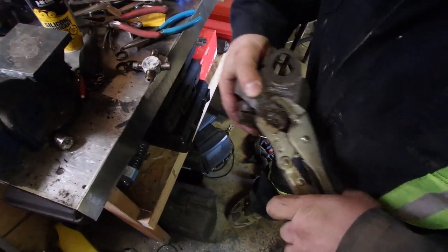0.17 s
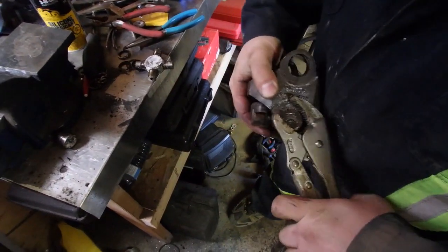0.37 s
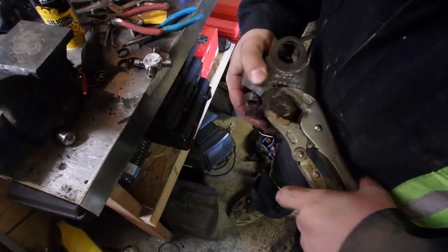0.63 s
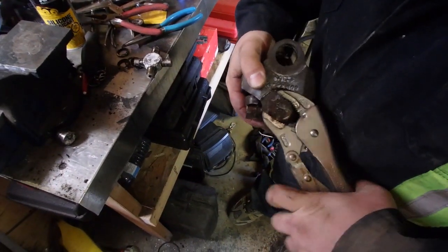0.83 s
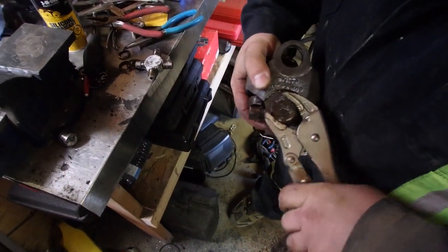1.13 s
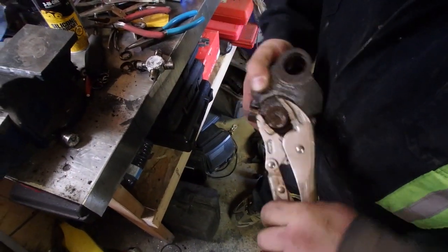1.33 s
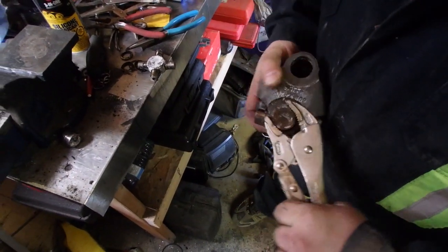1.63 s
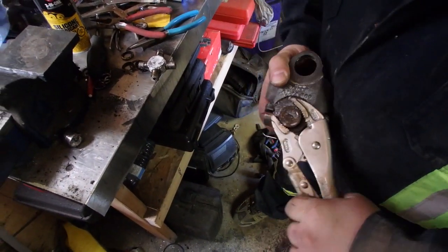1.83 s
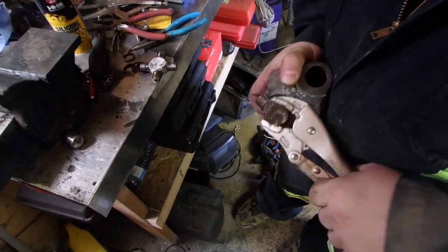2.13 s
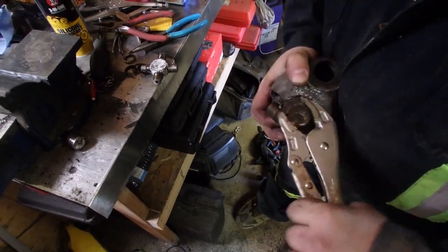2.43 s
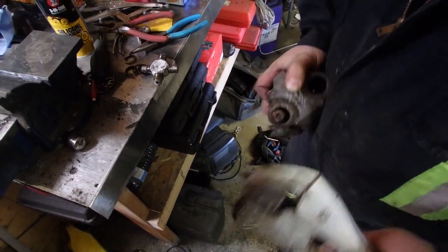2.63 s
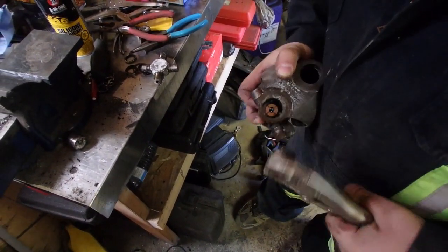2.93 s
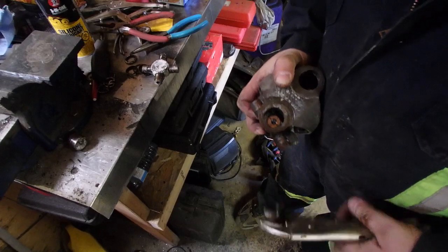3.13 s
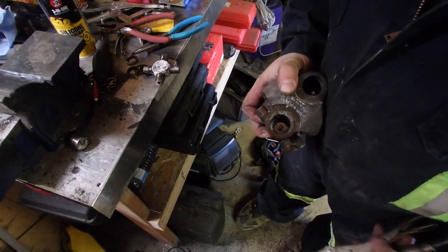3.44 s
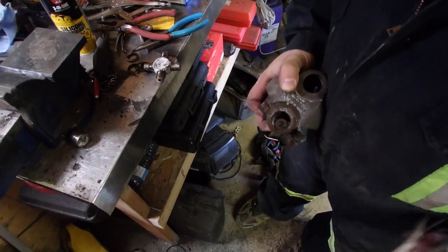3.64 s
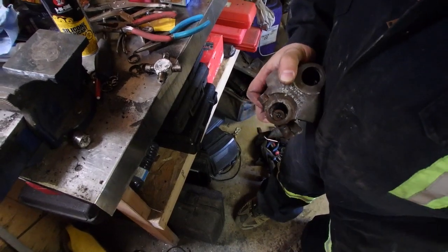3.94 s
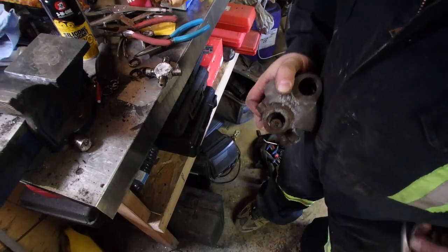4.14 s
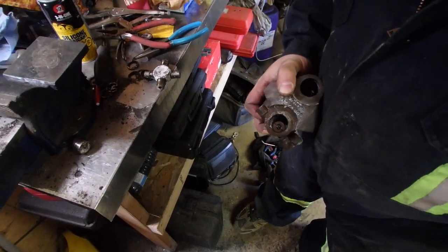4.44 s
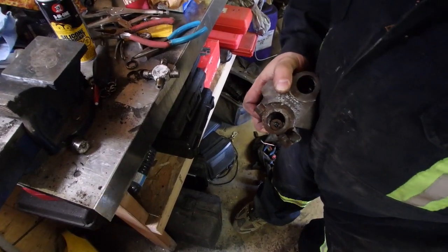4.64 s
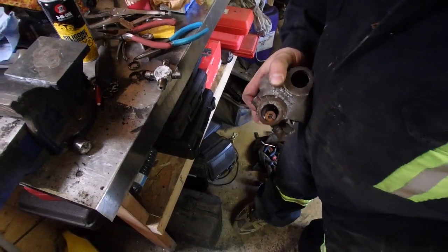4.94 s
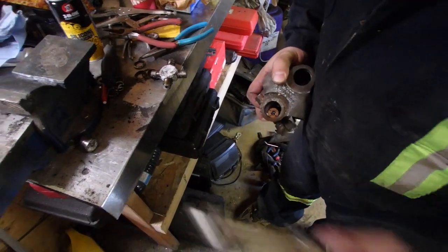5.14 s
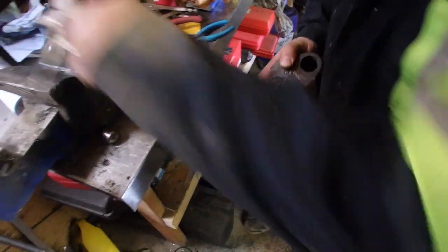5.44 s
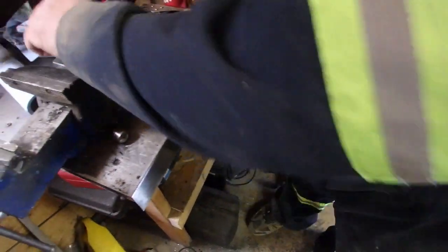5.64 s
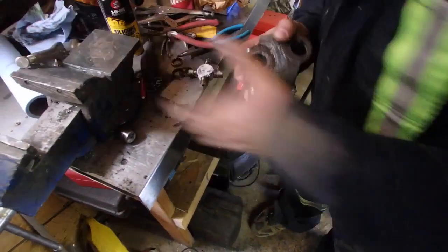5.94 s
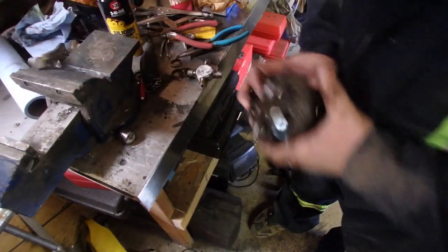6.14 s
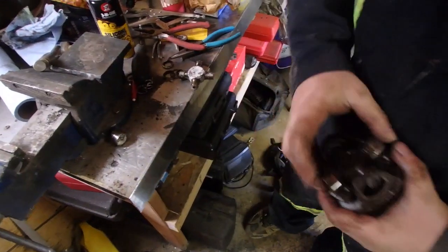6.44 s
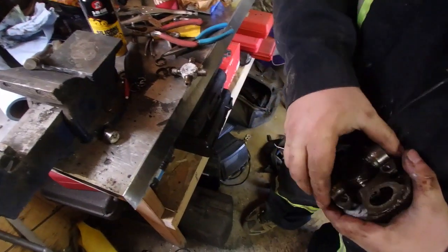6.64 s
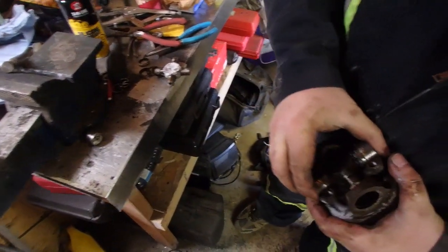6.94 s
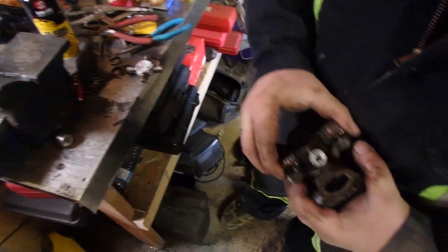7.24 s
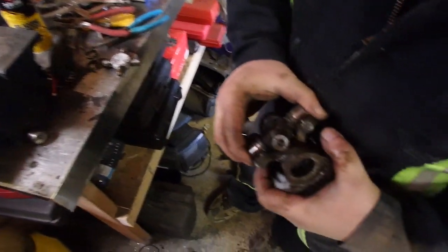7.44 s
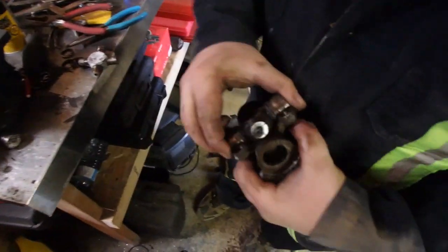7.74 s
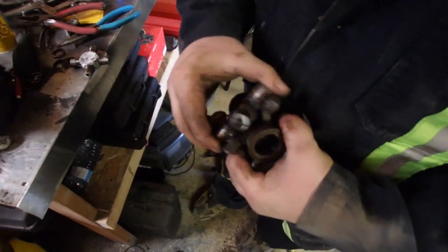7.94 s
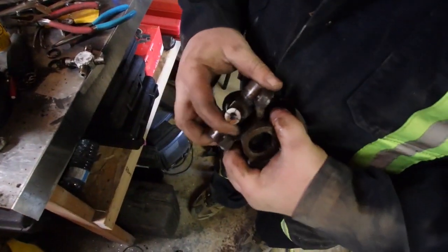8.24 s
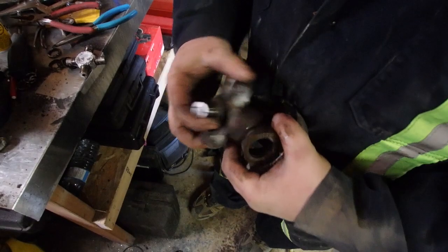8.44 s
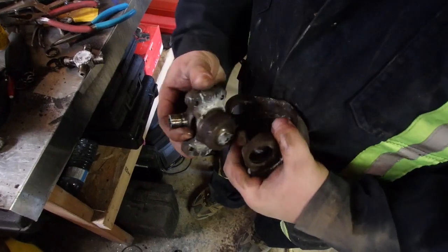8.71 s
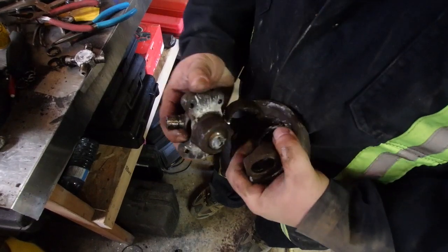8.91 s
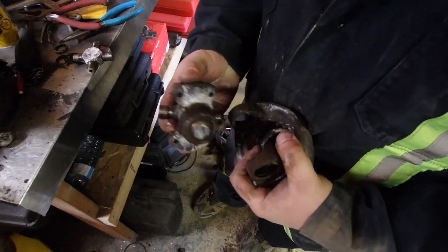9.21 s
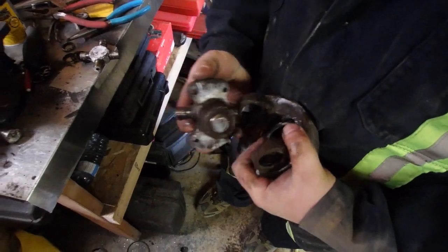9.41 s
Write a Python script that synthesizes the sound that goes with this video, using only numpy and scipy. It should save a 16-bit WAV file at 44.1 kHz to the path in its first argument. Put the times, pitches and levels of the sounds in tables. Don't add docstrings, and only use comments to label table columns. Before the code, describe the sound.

A belt-driven blower runs without pause for about 9.6 seconds in a garage: a steady low-mid hum with a blade tone near 215 Hz, rough pulsing about twenty times a second, thin swelling whines, belt slap and rushing air. It starts slightly subdued and rises quickly. Close by, a dull steel tick comes at 0.15 s, a light tap at 1.0 and a hard, bright pliers click at 1.5, after which the drone ducks and recovers over a second. Only drone follows until tiny bright ticks at 4.9, then a sharp click at 5.2. Around 5.75 to 6.0 a snap, faint rattle and pliers landing with a short thud and bounces on the bench. A final click rings at 6.3 and a small tick at 6.5. The drone, ducked again, climbs back and continues alone to the end. The camera microphone sounds slightly boxy, with little stereo width in the lows.

```python
import sys
import numpy as np
from scipy import signal
from scipy.fft import rfft, irfft, next_fast_len
from scipy.io import wavfile
from scipy.ndimage import uniform_filter1d

SR = 44100
rng = np.random.default_rng(int(sys.argv[2]) if len(sys.argv) > 2 else 0)


def gain_from_db(level_db):
    decades = np.asarray(level_db, float) / 20
    return 10 ** decades


def materialize(psi):
    bounded = np.clip(np.atleast_2d(psi).T, -1, 1)
    quanta = np.round(bounded * 32767).astype(np.int16)
    wavfile.write(sys.argv[1], SR, quanta)


N = 422037
EDGE_HZ = 14250

# centre in Hz, width in Hz, height in dB.
CASING_MODES = [(541, 34, 11.5), (993.6, 37, 12.5), (1130, 40, -2.5)]


def unit(x):
    return x / np.sqrt(np.mean(x ** 2) + 1e-20)


def along(points, hz):
    f, v = np.transpose(points)
    return np.interp(np.log(hz + 1), np.log(f + 1), v)


def bumps(modes, hz):
    return sum(db / (1 + (2 * (hz - centre_hz) / width) ** 2) for centre_hz, width, db in modes)


def wobble(rate, count):
    knots = rng.standard_normal((count, int(N * rate / SR) + 2))
    at = np.arange(N) * rate / SR
    return np.array([np.interp(at, np.arange(len(k)), k) for k in knots])


def filtered(x, response):
    m = next_fast_len(x.shape[-1] + 8192)
    return irfft(rfft(x, m) * response(np.fft.rfftfreq(m, 1 / SR)), m)[..., :x.shape[-1]]


def stereo(mid, other):
    # frequency in Hz, side minus mid in dB.
    apart = [(60, -53), (110, -67), (200, -81), (370, -18.5), (690, -28), (1270, -23), (2340, -22),
             (4300, -6.5), (7910, -3.5), (14600, 4.5)]
    # frequency in Hz, left minus right in dB.
    lean = [(60, 0), (240, 0), (370, -.5), (930, 0), (2300, .4), (4500, 2), (9000, .7), (14600, .5)]
    # frequency in Hz, phase by which left leads in radians.
    lead = [(2840, 0), (3100, -0.85), (4130, 0.93), (4390, -2), (4740, 0.76), (5940, -0.63), (6370, 0.27),
            (14700, 1)]
    side = filtered(other, lambda hz: gain_from_db(along(apart, hz) - 2.7 * (hz > 2500) - 15 * (hz < 250)))
    half = np.array([[.5], [-.5]])
    paths = lambda hz: gain_from_db(half * along(lean, hz)) * np.exp(1j * half * along(lead, hz))
    return filtered(np.array([mid + side, mid - side]), paths)


def gain_db():
    # start in seconds, gain in dB.
    ducks = [
        (-.05, -7),
        (.986, -3),
        (1.491, -12),
        (5.182, -15),
        (5.785, -13),
        (5.928, -12.5),
        (6.292, -12),
    ]
    t = np.arange(N) / SR
    hold = .05
    ramps = [np.where(t >= s, np.clip(db + 12 * (t - s - hold), db, 0), 0) for s, db in ducks]
    keep = np.exp(-1 / (0.004 * SR))
    return signal.lfilter([1 - keep], [1, -keep], np.min(ramps, 0), zi=[ducks[0][1]])[0]


def mains_hum():
    # frequency in Hz, level in dB rms.
    mains = [(120, -62)]
    t = np.arange(N) / SR
    return sum(gain_from_db(db + 12.5) * np.sin(2 * np.pi * hz * t) for hz, db in mains)


def rushing_air():
    # frequency in Hz, level in dB per Hz.
    air_colour = [(25, -53), (55, -52), (80, -40), (190, -22), (280, -18), (750, -18.5), (1000, -11),
                  (2060, -18), (3840, -12.5), (4600, -14.5), (6970, -17), (11700, -31.5), (13300, -49),
                  (14200, -56)]
    z = signal.stft(rng.standard_normal((2, N)), nperseg=512)[2]
    field = rng.standard_normal(z.shape[1:])
    field = uniform_filter1d(uniform_filter1d(field, 6, 0), 12, 1)
    air = signal.istft(z * gain_from_db(0.83 * unit(field)), nperseg=512)[1][:, :N]
    return unit(filtered(air, lambda hz: gain_from_db(along(air_colour, hz) + 1.02 * bumps(CASING_MODES, hz))))


def belt_slap(turns):
    # frequency in Hz, level in dB per Hz.
    slap_colour = [(50, -59), (90, -22), (180, -35), (260, -12.5), (550, -15), (750, -14), (980, -10.5),
                   (1390, -13.5), (1800, -15.5), (2400, -43.5)]
    lap = rng.standard_normal((2, 16384))
    belt_turns = 8
    place = (turns / belt_turns % 1 * lap.shape[1]).astype(int)
    return unit(filtered(lap[:, place], lambda hz: gain_from_db(along(slap_colour, hz) + 0.52 * bumps(CASING_MODES, hz))))


def ticks():
    # start in seconds, peak in dB, ring in Hz, second ring in Hz, t60 in seconds.
    touches = [
        (0.149, -10, 3470, 4300, 0.02),
        (1.495, -22, 4030, 7000, .12),
        (4.8994, -25, 7560, 8200, .03),
        (4.9624, -17.5, 7840, 11700, .06),
        (5.186, -19, 3330, 3940, 0.12),
        (5.2214, -26, 3800, 3530, 0.067),
        (5.434, -33, 2360, 2570, .06),
        (5.764, -28, 11700, 8300, .07),
        (6.2934, -22, 3100, 5450, 0.09),
        (6.4852, -20.5, 3970, 4870, 0.057),
    ]
    out, t = np.zeros(N + SR), np.arange(SR // 4) / SR
    quiet_db = gain_db()
    for s, db, ring_hz, second_hz, t60 in touches:
        shake = np.cumsum(rng.normal(0, 0.079, (2, len(t))), axis=1)
        first = np.sin(2 * np.pi * ring_hz * t + shake[0])
        second = gain_from_db(-9.5) * np.sin(2 * np.pi * second_hz * t + shake[1])
        at = round(s * SR)
        fade = gain_from_db(db - 4 - quiet_db[at] - 60 * t / t60) * (1 - np.exp(-t / 0.0004))
        out[at:at + len(t)] += fade * (first + second)
    return out[:N]


def knocks():
    # frequency in Hz, level in dB.
    plier_modes = [(3300, 0), (3900, 2), (5400, -7), (7000, -2), (8100, 7), (9800, -3), (11700, -14)]
    # frequency in Hz, level in dB.
    bench_colour = [(60, -50), (150, -18), (280, 1), (450, 0.5), (850, -5), (1200, -4), (2500, -13),
                    (5000, -27)]
    # frequency in Hz, level in dB.
    crack_colour = [(800, -24), (2400, -4), (4000, 2.5), (7000, 1), (10000, -5), (12500, -14), (14000, -16),
                    (15500, -30)]
    # start in seconds, peak in dB, ring in Hz, t60 in seconds, left minus right in dB.
    clicks = [
        (0.1516, -20, 6900, 0.028, -.5),
        (1.4906, -10, 3840, .08, -.5),
        (1.4914, -8.5, 7900, 0.016, 0),
        (5.1848, -10.5, 6420, 0.083, 4),
        (5.7626, -21, 7100, 0.044, 7),
        (5.785, -12.5, 6900, 0.07, 4),
        (5.866, -32, 7100, 0.066, 4),
        (5.911, -27, 3980, 0.12, 9),
        (6.292, -16.5, 6860, 0.088, 4),
    ]
    # start in seconds, peak in dB, ring in Hz, t60 in seconds, thud in dB.
    thuds = [
        (0.985, -21, 6900, 0.037, -4),
        (5.738, -33, 1500, .1, 1),
        (5.9268, -18, 3220, 0.068, -0.5),
        (5.934, -19, 2960, .08, 1.5),
        (5.9463, -29.5, 4500, 0.1, 2),
        (5.9882, -28, 3150, 0.098, 2.5),
    ]
    # 0.5 dB to the left, snap up to 7500 Hz
    contacts = [(*row, -18, 11900) for row in clicks]
    contacts += [(*row, 0.5, thud_db, 7500) for *row, thud_db in thuds]
    out, t = np.zeros((2, N + SR)), np.arange(SR // 4) / SR
    quiet_db = gain_db()
    fade = lambda life: gain_from_db(-60 * t / np.clip(life, .004, .5)) * (1 - np.exp(-t / 0.00028))
    for s, db, ring_hz, t60, pan_db, thud_db, top_hz in contacts:
        noise = rng.standard_normal((5, len(t)))
        own = unit(filtered(noise[0], lambda hz: 1 / (1 + ((hz - ring_hz) / 250) ** 2)))
        thud = unit(filtered(noise[1], lambda hz: gain_from_db(along(bench_colour, hz))))
        crack, *wash = unit(filtered(noise[2:], lambda hz: gain_from_db(along(crack_colour, hz)) * (hz < EDGE_HZ)))
        snap = filtered(noise[2], lambda hz: hz ** 2 / (hz ** 2 + 2000 ** 2) / (1 + (hz / top_hz) ** 4))
        modes = 0
        for hz, level in plier_modes:
            modes = modes + gain_from_db(level + rng.normal(0, 2.7)) * np.sin(2 * np.pi * hz * rng.normal(1, 0.032) * t)
        near = 0.55 * own * fade(t60) + 0.099 * modes * fade(0.78 * t60)
        near = near + 0.99 * snap * fade(0.0098) + 0.51 * crack * fade(1.4 * t60)
        near = near + gain_from_db(thud_db) * thud * fade(1.46 * t60)
        heard = near * gain_from_db([[pan_db / 2], [-pan_db / 2]]) + gain_from_db(-10) * np.array(wash) * fade(2.5 * t60)
        at = round(s * SR)
        out[:, at:at + len(t)] += gain_from_db(db - 4.5 - quiet_db[at]) * heard
    return out[:, :N]


def orders():
    # multiple of the shaft, level in dB.
    bed = [(3, -45), (6, -28), (7, -19), (10, -25), (12, -14), (18, -13), (23, -19), (68, -20)]
    strong = [4, 8, 11, 22, 28, 33, 36, 41, 43, 48, 58]
    strong_db = [-13, -14, 0, -15, -9, -16, -14.5, -17, -16, -21, -13]
    whines = [(50, .44), (61, .15)]
    k = np.arange(68 + 1)
    chance = rng.standard_normal((2, len(k)))
    high = k > 16
    db = np.interp(k, *np.transpose(bed)) + 3 * chance[0] * high
    db[strong] = strong_db
    late = np.where(high, chance[1], k * .665 + .33 * (k <= 8))
    size = gain_from_db(db) * np.exp(-2j * np.pi * late)
    slide = .11
    side = gain_from_db(-3.5)
    for (centre, at), whine_db, partner_db in zip(whines, [-2.5, -8], [-4, -9]):
        swell = np.array([side, 1, side]) * np.exp(2j * np.pi * np.array([at + slide, 0, slide - at]))
        size[centre - 1:centre + 2] = gain_from_db(whine_db) * swell
        size[centre + 3:centre + 6] = gain_from_db(whine_db + partner_db) * swell
    return k[:, None], size[:, None]


def shaft_tones(turns):
    sway = wobble(2.5, count=11)
    k, size = orders()
    unsteady = sway[k[:, 0] % len(sway), ::10] * k / 50
    angle = (turns + .0014 * np.cos(2 * np.pi * turns / 4))[::10]
    tones = size * gain_from_db(0.72 * unsteady) * np.exp(1j * (2 * np.pi * k * angle + 0.32 * unsteady))
    return signal.resample_poly(tones.real.sum(0), 10, 1)[:N]


def blower():
    # time in seconds, speed in turns per second.
    shaft = [(0, 19.58), (3.9, 19.582), (8.5, 19.577), (9.6, 19.577)]
    turns = np.cumsum(np.interp(np.arange(N) / SR, *np.transpose(shaft))) / SR
    tones = gain_from_db(-26) * shaft_tones(turns) + mains_hum()
    echoed = np.array([tones, np.roll(tones, 333)])
    return stereo(*(echoed + gain_from_db(-30.0) * belt_slap(turns) + gain_from_db(-28) * rushing_air()))


def shaded(x):
    # time in seconds, echo delay in ms, openness in dB.
    worker = [(0, 4.3, -2), (1, 2.9, 0), (2, 3.46, -1.5), (2.8, 3.4, -0.5), (4.6, 3.2, -0.5),
              (5.6, 1.44, -0.5), (6.2, 2.6, -1.5), (7.2, 4.2, -0.5), (8.3, 3.7, 1), (9.6, 4, 0)]
    # centre in Hz, share of the openness, level in dB.
    screened = [(388, 1.13, 0.5), (1130, 0.66, 0.15)]
    s, delay_ms, open_db = np.transpose(worker)
    t = np.arange(N) / SR
    late = np.arange(N) - np.interp(t, s, delay_ms) * SR / 1000
    echo = filtered(x, lambda hz: hz ** 2 / (hz ** 2 + 350 ** 2) / (1 + (hz / 2500) ** 4))
    x = x + gain_from_db(-23.0) * np.array([np.interp(late, np.arange(N), port) for port in echo])
    for centre_hz, share, db in screened:
        band = filtered(x, lambda hz: np.exp(-(np.log((hz + 1) / centre_hz) / 0.6) ** 2))
        x = x + (gain_from_db(db + share * np.interp(t, s, open_db)) - 1) * band
    return x


def scene():
    return filtered(shaded(blower()), lambda hz: hz < EDGE_HZ) + knocks() + ticks()


def low_pass(x):
    return signal.sosfilt(signal.butter(12, 15170, fs=SR, output="sos"), x)


def record(dry):
    # centre in Hz, width in Hz, height in dB.
    housing = [(2204, 295, 6), (3150, 56, 9.5), (4136, 650, 4), (4300, 110, 1.5), (4540, 290, -10),
               (5105, 170, 5), (5425, 47, 8.5), (6985, 300, 5.5), (8760, 130, 4), (10280, 350, 4)]
    # centre in Hz, width in Hz, depth in dB.
    notches = [(2036, 45, -17), (3062, 60, -19), (4100, 35, -16), (5120, 60, -16), (6140, 60, -17)]
    heard = filtered(dry, lambda hz: gain_from_db(bumps(housing + notches, hz)) / (1 + (hz / 14500) ** 50))
    return low_pass(heard * gain_from_db(gain_db()))


dry = scene()
out = record(dry)
materialize(out)
```